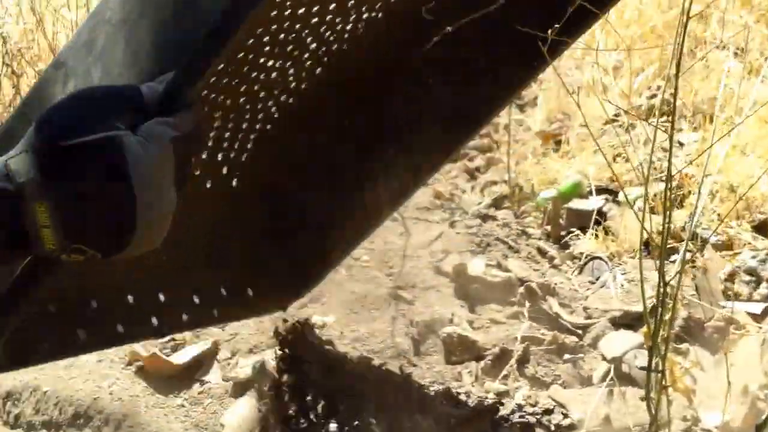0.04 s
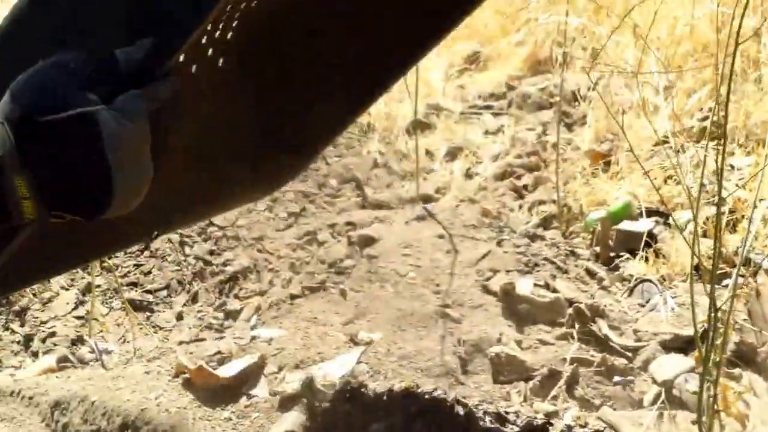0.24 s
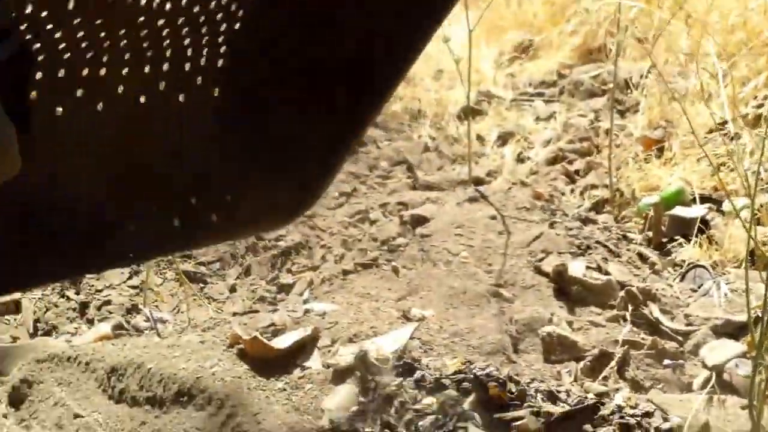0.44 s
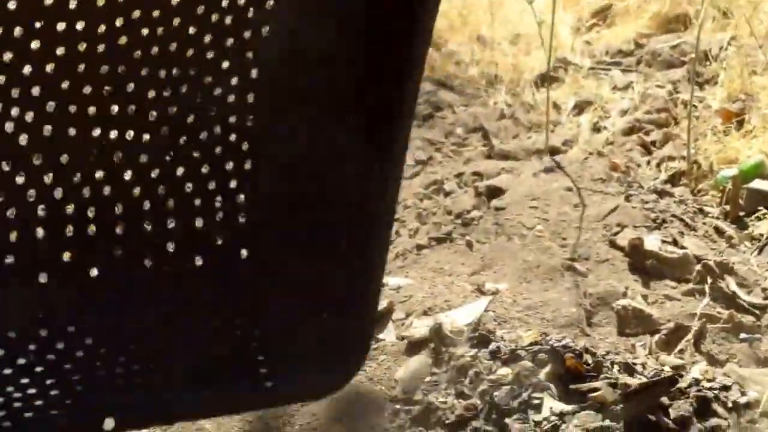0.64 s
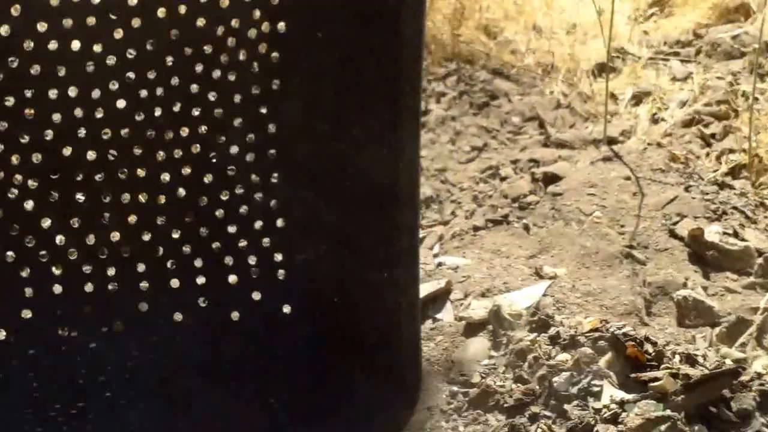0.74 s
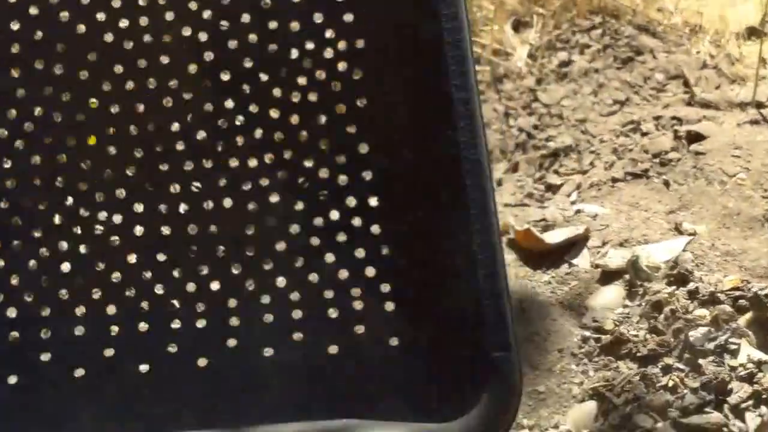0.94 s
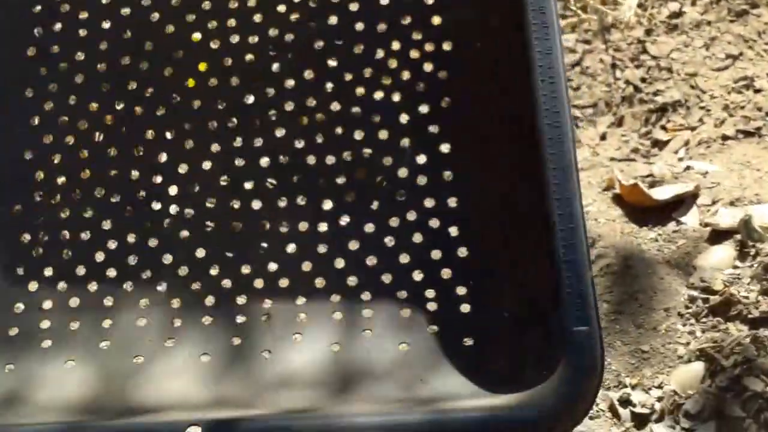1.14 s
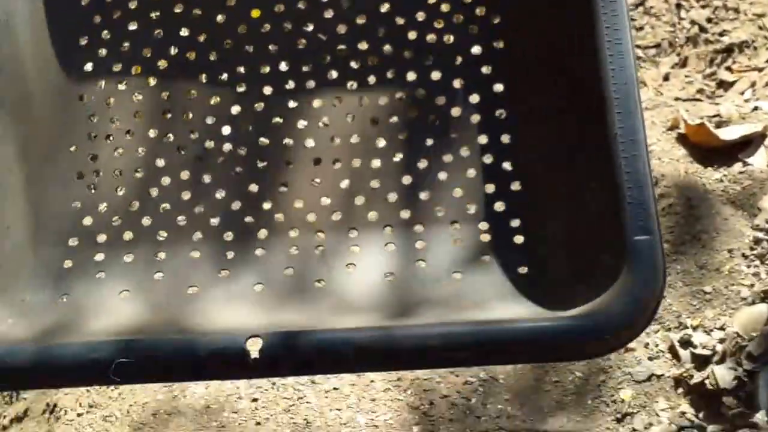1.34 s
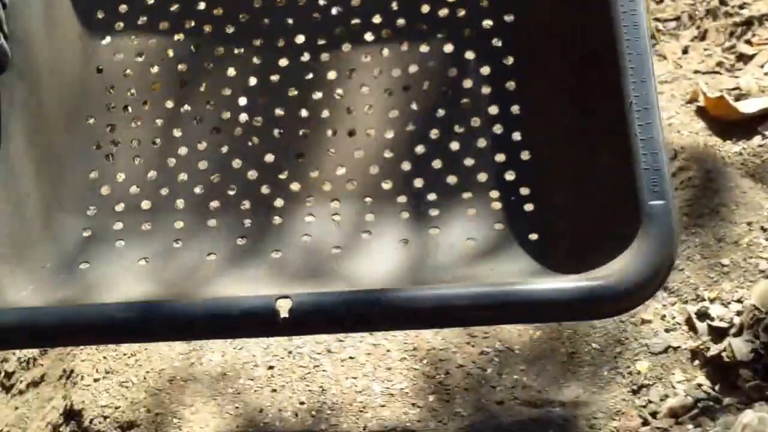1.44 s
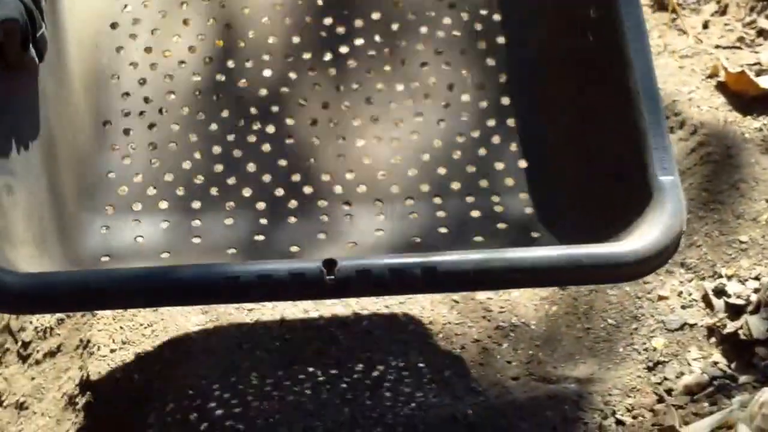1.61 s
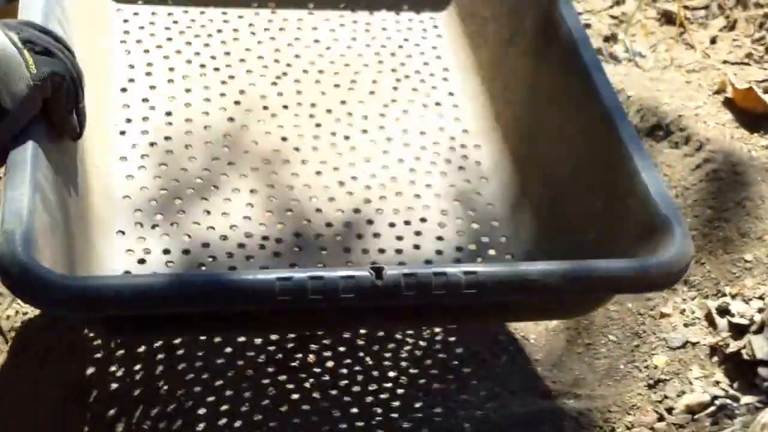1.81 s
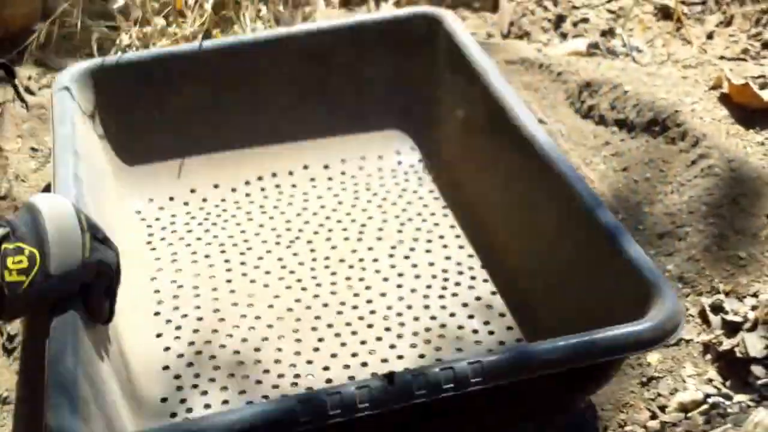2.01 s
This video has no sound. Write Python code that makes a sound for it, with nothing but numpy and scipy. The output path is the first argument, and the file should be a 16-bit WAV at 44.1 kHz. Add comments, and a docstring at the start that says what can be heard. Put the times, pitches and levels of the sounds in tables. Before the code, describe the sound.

Dry grit slides off a plastic sieve tub, a bright, crisp rattle with pebble pings and clods, strongest around 0.2 to 0.3 seconds with a soft low thump, and a dull patter on soil beneath. It thins by 0.6. Isolated stone ticks come near 0.9, a small cluster of pings at 1.2 to 1.5, last ticks near 1.95. Low air rumble, soft handling bumps and faint outdoor rush continue, close and dry.

```python
"""Dry dirt and grit slide out of a tilted plastic sieve tub and patter on the ground, with a low thump;
as the tub is swung level, the last pebbles tick and ping across its floor, over low rumble and a faint rush.
Grit, dust, dirt and clods are coloured trains of random impacts; pebbles and stray grit are decaying sines.
Ticks are noise bursts through resonances, the flexing tub is a set of low modes, its shudder one low tone.
Handling jolts are single low pulses; air on the close microphone, rubbing and the outdoors are coloured noise."""
import sys
import numpy as np
from scipy import signal
from scipy.fft import rfft, irfft, next_fast_len
from scipy.io import wavfile
from scipy.ndimage import uniform_filter1d, map_coordinates

SR = 44100
rng = np.random.default_rng(int(sys.argv[2]) if len(sys.argv) > 2 else 0)


def pcm_store(signal):
    """Save signal as 16-bit PCM."""
    levels = np.round(np.clip(np.atleast_2d(signal), -1, 1) * 32767)
    wavfile.write(sys.argv[1], SR, levels.astype(np.int16).T)


N = 91242  # length in samples

# Flow of grit over the plastic. Each row: time in seconds, level in dB.
SLIDE_LEVEL = [(0, -31.5), (.035, -31), (.13, -30), (.175, -23.5), (.22, -27), (.27, -20.5), (.31, -21.5),
               (.35, -31.5), (.42, -35.5), (.5, -40), (.55, -42), (.6, -50), (.72, -80)]
# Colour of the grit on the plastic. Each row: frequency in Hz, gain in dB.
GRIT_COLOUR = [(880, -59), (1500, -28), (1710, -16), (2040, -30), (2370, -17), (2590, -28.5), (3920, -11),
               (5170, -9.5), (6060, -11), (9650, 3.5), (11500, -6), (13300, 2), (16000, -11)]
GRIT_PER_S, GRIT_SPREAD_DB = 7700, 2.5  # impacts per second, mean boost of an impact before the cap
GRIT_CLUMP_DB, GRIT_PATCHY_DB = 1, 1  # depth of fast level clumps, depth of patches in the spectrum
GRIT_WANDER = 0.037  # share by which the pitch of the grit drifts

# Fine dust trickling over the plastic. Each row: time in seconds, level in dB.
DUST_LEVEL = [(.5, -60), (.62, -53), (.75, -57.5), (.88, -57), (1.08, -50.5), (1.3, -50.5), (1.55, -56),
              (1.85, -58.5), (2.06, -53.5)]
# Colour of the dust. Each row: frequency in Hz, gain in dB.
DUST_COLOUR = [(2500, -34), (5500, -15), (7500, -5.5), (9400, 0.5), (11500, -9.5), (13500, -6.5),
               (16000, -16)]

# Showers of stray grit. Each row: start in seconds, end in seconds, grains per second, typical level in dB.
STRAY_SHOWERS = [(0, 0.328, 240, -25), (0.331, 0.512, 170, -30.5), (0.512, 0.701, 140, -45),
                 (1.201, 1.52, 550, -45), (1.522, 2.059, 31, -47)]
STRAY_HZ, STRAY_SCATTER = 11100, 0.184  # middle pitch, its log spread
STRAY_T60_S, STRAY_LIFE_SCATTER = 0.0057, 0.45  # middle ring time, its log spread
STRAY_SPREAD_DB, STRAY_CLICK_DB, STRAY_CLICK_T60_S = 2, -1.5, 0.0012

# Dirt landing on the ground. Each row: time in seconds, level in dB.
POUR_LEVEL = [(0, -48.5), (.06, -44), (.11, -37), (.16, -35), (.22, -40), (.29, -75)]
# Colour of dirt on soil. Each row: frequency in Hz, gain in dB.
SOIL_COLOUR = [(200, -5), (450, -6.5), (700, -2.5), (1500, -0.5), (2500, 0.5), (4500, -1.5), (8000, -12),
               (16000, -43)]

# Pebbles that ring. Each row: start in seconds, level in dB, pitch in Hz, t60 in seconds.
PEBBLE_PINGS = [(0.0504, -9, 9930, 0.015), (0.0964, -16, 15550, 0.049), (0.114, -18, 15500, 0.041),
                (0.1205, -26, 14200, .07), (.154, -12, 13800, 0.045), (0.248, -14, 11100, 0.029),
                (0.263, -19, 13200, 0.03), (.269, -22, 5470, .012), (.289, -10, 9900, 0.024),
                (0.411, -20, 14200, 0.023), (0.452, -30.5, 4170, 0.012), (0.5038, -24, 9200, 0.023),
                (0.5202, -35, 3900, .03), (0.526, -22, 9160, 0.018), (0.5374, -34.5, 3980, 0.028),
                (1.1616, -32, 9220, 0.028), (1.253, -26, 11900, 0.04), (1.269, -25.5, 13000, 0.023),
                (1.2815, -20.5, 13000, 0.057), (1.302, -32, 12980, 0.064), (1.317, -29, 12980, 0.074),
                (1.4071, -21, 11600, 0.0086)]
# Side modes of a pebble. Each row: ratio to the pitch, level in dB.
PEBBLE_SIDE_MODES = [(.81, -20), (.92, -14), (1.08, -26), (1.41, -9)]
SIDE_LIFE, SIDE_SCATTER = 0.6, 0.029  # side-mode t60 as a share of the main one, spread of the ratios
RING_ROUGH, PING_ATTACK_S = 0.47, 0.00016  # phase jitter in radians, onset time
CONTACT_DB, CONTACT_T60_S = -11.5, 0.02
PLASTIC_HZ, PLASTIC_DB = 5890, -21  # the ring of the tub floor under a pebble

# Dry ticks of stones on the plastic. Each row: start in seconds, level in dB (total energy),
# pitch in Hz, gain of the narrow ring against the broad crack in dB.
STONE_TICKS = [(.0888, -7.5, 11500, -6), (.3045, -4.5, 8700, 8), (.5372, -10, 9300, 14),
               (.873, -11.5, 9500, -29), (0.9085, -15, 11400, -14), (1.2268, -12.5, 11000, -6),
               (1.3676, -18, 9500, 4), (1.4865, -23, 13500, 9), (1.5322, -15.5, 8200, 9),
               (1.937, -16.5, 8500, 23), (1.9895, -20, 7440, -10)]
TICK_Q, TICK_RING_WIDTH_HZ = 2.17, 686  # sharpness of the crack, width of the ring
SCUFF_T60_S, BOUNCE_S, BOUNCE_DB = 0.00095, 0.0033, -14.5  # a stone's contact, and its one bounce

# Small clods that tumble off the tub. Each row: start in seconds, level in dB.
CLOD_FALLS = [(.008, -11.5), (0.162, -8), (0.388, -14.5), (0.518, -24), (0.5366, -19), (1.255, -25.5)]
# Colour of the clods. Each row: frequency in Hz, gain in dB.
CLOD_SPECTRUM = [(1000, -19), (3000, -18), (4000, -12), (6000, -9), (7000, -5), (8300, 7.5), (10300, 8),
                 (12000, -7), (16000, 1)]
CLOD_ATTACK_S, CLOD_T60_S = 0.0015, 0.024

# The tub wall flexes. Each row: start in seconds, level in dB.
TUB_FLEXES = [(0.253, -18), (0.278, -22.5), (0.308, -28.5)]
# Low modes of the tub. Each row: frequency in Hz, level in dB, t60 in seconds.
TUB_MODES = [(36.8, -2, 0.31), (73.3, 5.5, 0.11), (102, 8, 0.073), (145, 5, 0.059)]
FLEX_ATTACK_S, FLEX_TOP_HZ = 0.0043, 450  # onset time, corner above which the thump is softened

SHUDDER_START_S, SHUDDER_END_S, SHUDDER_RELEASE_S = 1.355, 1.477, 0.04
SHUDDER_HZ, SHUDDER_DB = 82.2, -27.5  # middle pitch and level

# Jolts from handling the tub. Each row: centre in seconds, peak in dB, pitch in Hz.
HANDLING_JOLTS = [(.859, -20.5, 50), (1.204, -19.5, 54.4), (1.538, -13, 30), (1.755, -15, 33.4)]

# Air buffeting the microphone as the tub swings. Each row: time in seconds, level in dB.
RUMBLE_LEVEL = [(0, -36.5), (.14, -34.5), (.6, -31), (.92, -34.5), (1.05, -28), (1.29, -33), (1.4, -26),
                (1.85, -32)]
# Colour of the buffeting. Each row: frequency in Hz, gain in dB.
RUMBLE_SPECTRUM = [(10, -16.5), (27, 5), (42, -2.5), (65, -3.5), (95, -6.5), (125, -19), (200, -47),
                   (400, -81)]
# Dull rubbing of the glove on the tub. Each row: time in seconds, level in dB.
HANDLING_LEVEL = [(0, -52.5), (.45, -46.5), (.8, -43), (.95, -50.5), (1.1, -40.5), (1.3, -46.5),
                  (2.06, -48.5)]
# Colour of the rubbing. Each row: frequency in Hz, gain in dB.
HANDLING_SPECTRUM = [(60, -12), (120, 4.5), (160, -2), (240, -6), (400, -29.5), (1000, -55)]

# Colour of the outdoor rush. Each row: frequency in Hz, gain in dB.
AIR_COLOUR = [(230, 0.5), (330, -1.5), (480, -5), (750, -1.5), (1100, 0), (1700, -4), (2600, -12.5),
              (5000, -17.5), (9000, -23.5), (16000, -52)]
AIR_DB = -45.5  # middle level of the rush
TOP_HZ = 15850  # middle of the final treble cut


def amp(db):
    """Decibels to a linear gain."""
    return 10 ** (np.asarray(db) / 20)


def unit(x):
    """x scaled to rms 1."""
    return x / np.sqrt(np.mean(x ** 2) + 1e-20)


def along(points, hz):
    """Values read between (Hz, value) points on a log frequency axis."""
    f, v = np.transpose(points)
    return np.interp(np.log(hz + 1), np.log(f + 1), v)


def curve(rows):
    """One value per sample from (seconds, value) rows."""
    return np.interp(np.arange(N) / SR, *np.transpose(rows))


def wobble(rate):
    """A smooth random curve with the given number of knots a second."""
    return map_coordinates(rng.standard_normal(N // 8), [np.arange(N) * rate / SR + 2])


def filtered(x, response):
    """x shaped by a response of frequency, padded so that tails do not wrap round."""
    m = next_fast_len(N + SR // 2)
    return irfft(rfft(x, m) * response(np.fft.rfftfreq(m, 1 / SR)), m)[:N]


def coloured(x, spectrum):
    """x filtered by the given colour, at rms 1."""
    return unit(filtered(x, lambda hz: amp(along(spectrum, hz))))


def noise(spectrum):
    """Coloured noise of rms 1."""
    return coloured(rng.standard_normal(N), spectrum)


def since(s):
    """Seconds since s, zero before it."""
    return np.maximum(np.arange(N) / SR - s, 0)


def rise(s, attack_s):
    """A soft onset at s."""
    return 1 - np.exp(-since(s) / attack_s)


def decay(s, t60):
    """An envelope that jumps to 1 at s and falls 60 dB per t60, down to a floor of -240 dB."""
    t = since(s)
    return (t > 0) * amp(-60 * np.minimum(t / t60, 4))


def grains(per_s, spread_db):
    """Random impacts of either sign and uneven, capped size, at rms 1."""
    size = amp(spread_db * np.minimum(rng.exponential(size=N), 3))
    hits = rng.random(N) < per_s / SR
    return unit(hits * size * rng.choice([-1, 1], N))


def patchy(x, depth_db):
    """x at rms 1, with smoothed random gains over time and frequency."""
    z = signal.stft(x, nperseg=256)[2]
    field = uniform_filter1d(rng.standard_normal(z.shape), size=3, axis=0)
    field = uniform_filter1d(field, size=3, axis=1)
    return unit(signal.istft(z * amp(depth_db * unit(field)), nperseg=256)[1][:N])


def resonance(f, hz, width_hz):
    """A causal resonance with gain 1 at its centre."""
    return 1j * f * width_hz / (hz ** 2 - f ** 2 + 1j * f * width_hz)


def sliding_grit():
    """Clumps of tiny impacts on the plastic; their pitch wanders as coarser and finer grit passes."""
    impacts = coloured(grains(GRIT_PER_S, GRIT_SPREAD_DB), GRIT_COLOUR)
    impacts = patchy(impacts, GRIT_PATCHY_DB)
    # an uneven reading speed bends the pitch
    reading_place = np.cumsum(1 + GRIT_WANDER * wobble(90))
    impacts = map_coordinates(impacts, [reading_place], mode="mirror")
    clumps = amp(GRIT_CLUMP_DB * wobble(350) + wobble(66.1))
    return amp(curve(SLIDE_LEVEL)) * unit(impacts * clumps)


def dust():
    """A thin, finely grained hiss of equal-sized tiny impacts."""
    return amp(curve(DUST_LEVEL)) * coloured(grains(per_s=6000, spread_db=0), DUST_COLOUR)


def stray_grit():
    """Loose grains hit the plastic at random moments, each with a click and a short ring."""
    out, t = np.zeros(N + SR), np.arange(SR // 25) / SR
    for start, end, per_s, db in STRAY_SHOWERS:
        count = int((end - start) * per_s)
        places = rng.random(count)
        draws = np.clip(rng.standard_normal((count, 3)), -2, 2)
        for place, (pitch, size, life) in zip(places, draws):
            hz = STRAY_HZ * np.exp(STRAY_SCATTER * pitch)
            t60 = STRAY_T60_S * np.exp(STRAY_LIFE_SCATTER * life)
            envelope = amp(-60 * t / t60) + amp(STRAY_CLICK_DB - 60 * t / STRAY_CLICK_T60_S)
            level = amp(db + STRAY_SPREAD_DB * size)
            first = int((start + place * (end - start)) * SR)
            out[first:first + len(t)] += level * envelope * np.sin(2 * np.pi * hz * t)
    return out[:N]


def falling_dirt():
    """A dull patter of many impacts as the load lands on soil."""
    return amp(curve(POUR_LEVEL)) * coloured(grains(per_s=5000, spread_db=1), SOIL_COLOUR)


def pebbles():
    """Each pebble rings high with a scratchy contact; side modes and plastic die before the main ring."""
    out, contact = np.zeros(N), noise(GRIT_COLOUR)
    jitter = RING_ROUGH * wobble(700)
    for s, db, hz, t60 in PEBBLE_PINGS:
        phase = 2 * np.pi * hz * since(s)
        sides = sum(amp(level) * np.sin(ratio * rng.normal(1, SIDE_SCATTER) * phase)
                    for ratio, level in PEBBLE_SIDE_MODES)
        plastic = amp(PLASTIC_DB) * np.sin(2 * np.pi * PLASTIC_HZ * since(s) + jitter)
        ring = np.sin(phase + jitter) * decay(s, t60)
        ring += (sides + plastic) * decay(s, SIDE_LIFE * t60)
        scratch = amp(CONTACT_DB) * contact * decay(s, CONTACT_T60_S)
        out += amp(db) * rise(s, PING_ATTACK_S) * (ring + scratch)
    return out


def ticks():
    """Single stones scuff the plastic: a sharp, broad crack, one weak bounce and a very short ring."""
    out = np.zeros(N)
    for s, db, hz, ring_db in STONE_TICKS:
        bounce = amp(BOUNCE_DB) * decay(s + BOUNCE_S, SCUFF_T60_S)
        contact = rng.standard_normal(N) * (decay(s, SCUFF_T60_S) + bounce)

        def body(f):
            """The broad crack plus the narrower ring at the same pitch."""
            return resonance(f, hz, hz / TICK_Q) + amp(ring_db) * resonance(f, hz, TICK_RING_WIDTH_HZ)

        crack = filtered(contact, body)
        out += amp(db) * crack / np.linalg.norm(crack)
    return out


def clods():
    """Each clod breaks into a short spray of grains."""
    spray = coloured(grains(per_s=8400, spread_db=1.5), CLOD_SPECTRUM)
    bursts = sum(amp(db) * rise(s, CLOD_ATTACK_S) * decay(s, CLOD_T60_S) for s, db in CLOD_FALLS)
    return bursts * spray


def tub_flex():
    """Soft jolts ring the low modes of the tub."""
    out = np.zeros(N)
    for s, db in TUB_FLEXES:
        modes = sum(amp(level) * np.sin(2 * np.pi * hz * since(s)) * decay(s, t60)
                    for hz, level, t60 in TUB_MODES)
        out += amp(db) * rise(s, FLEX_ATTACK_S) * modes
    return filtered(out, lambda hz: 1 / (1 + 1j * hz / FLEX_TOP_HZ) ** 2)


def shudder():
    """The tub shudders at one low, unsteady pitch as it comes level."""
    swell = rise(SHUDDER_START_S, FLEX_ATTACK_S) * (1 - rise(SHUDDER_END_S, SHUDDER_RELEASE_S))
    level = amp(SHUDDER_DB + 2 * wobble(19.84))
    return level * swell * np.sin(2 * np.pi * SHUDDER_HZ * since(SHUDDER_START_S) + wobble(20))


def jolts():
    """Each bump of the hand on the tub gives one low push with a shallow dip on either side."""
    out = np.zeros(N)
    for s, db, hz in HANDLING_JOLTS:
        u = (np.pi * hz * (np.arange(N) / SR - s)) ** 2
        out += amp(db) * (1 - 2 * u) * np.exp(-u)
    return out


def rumble():
    """Moving air buffets the microphone: low noise that swells and sinks."""
    return amp(curve(RUMBLE_LEVEL)) * noise(RUMBLE_SPECTRUM)


def handling():
    """The glove rubs on the tub: dull low noise."""
    return amp(curve(HANDLING_LEVEL)) * noise(HANDLING_SPECTRUM)


def outdoors():
    """A faint, distant rush of noise whose level barely wavers."""
    return amp(AIR_DB + 0.22 * wobble(4.7)) * noise(AIR_COLOUR)


def scene():
    """All layers summed to one channel."""
    load = sliding_grit() + dust() + stray_grit() + falling_dirt()
    stones = pebbles() + ticks() + clods()
    tub = tub_flex() + shudder() + jolts()
    background = rumble() + handling() + outdoors()
    return (load + stones + tub + background)[None]


def record(dry):
    """A steep treble cut, 300 Hz wide, leaves nothing above the band limit."""
    return filtered(dry[0], lambda hz: np.clip((TOP_HZ - hz) / 300 + 0.5, 0, 1))[None]


dry = scene()
out = record(dry)
pcm_store(out)
```